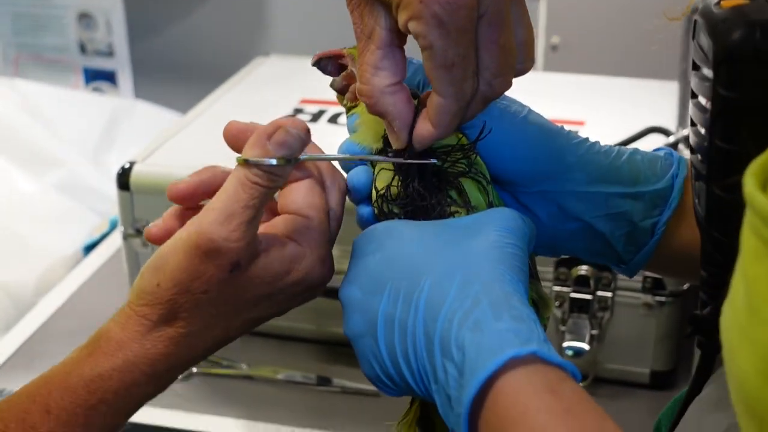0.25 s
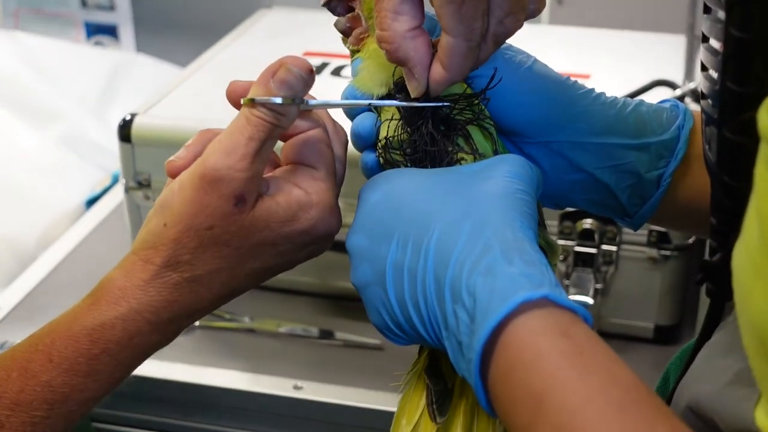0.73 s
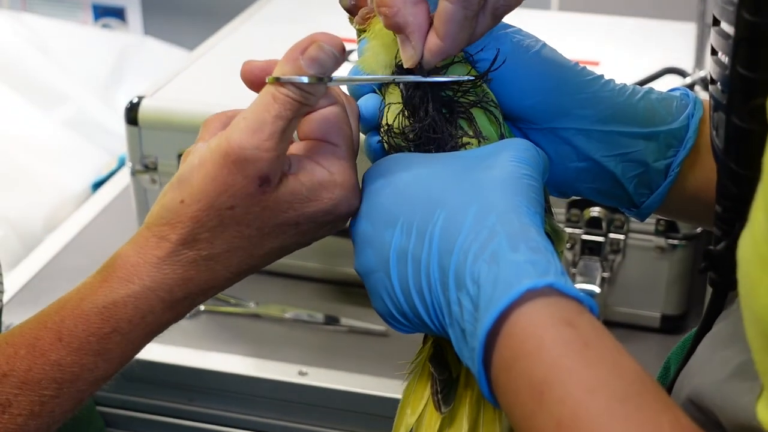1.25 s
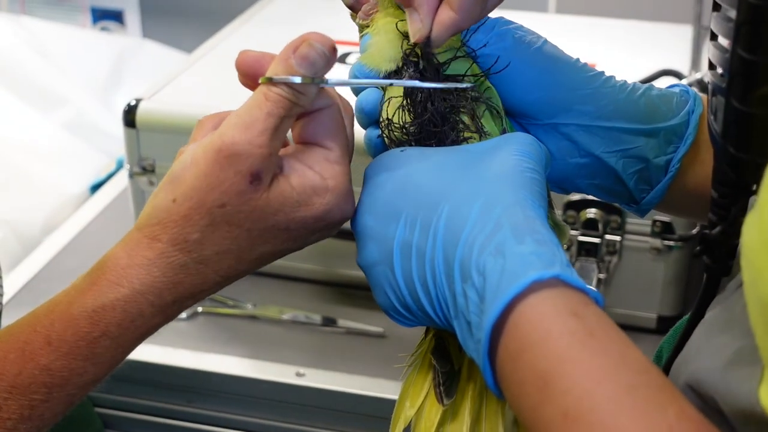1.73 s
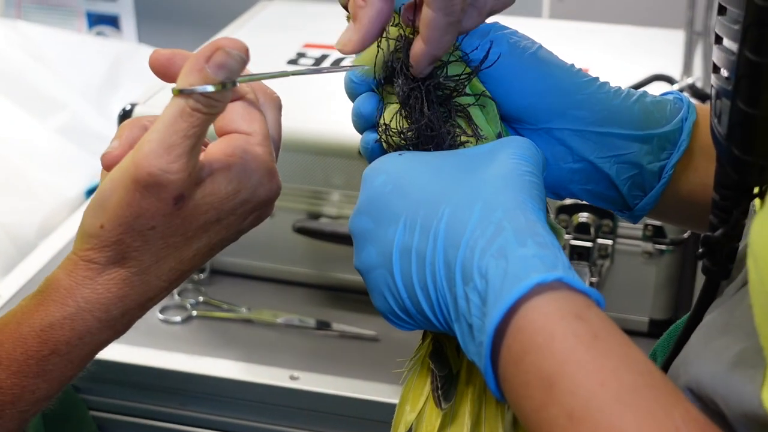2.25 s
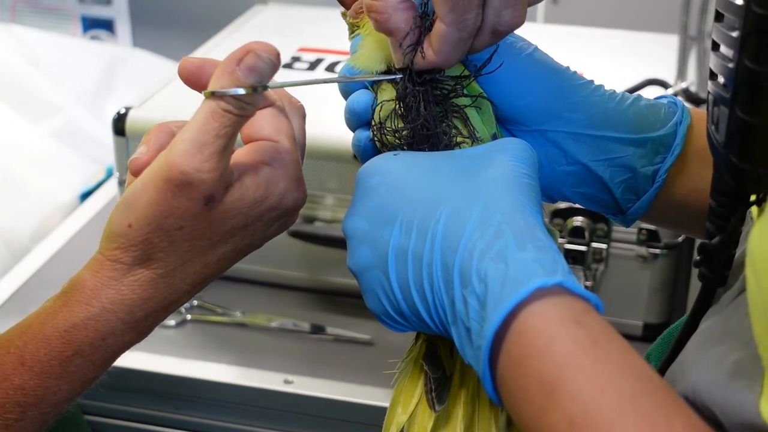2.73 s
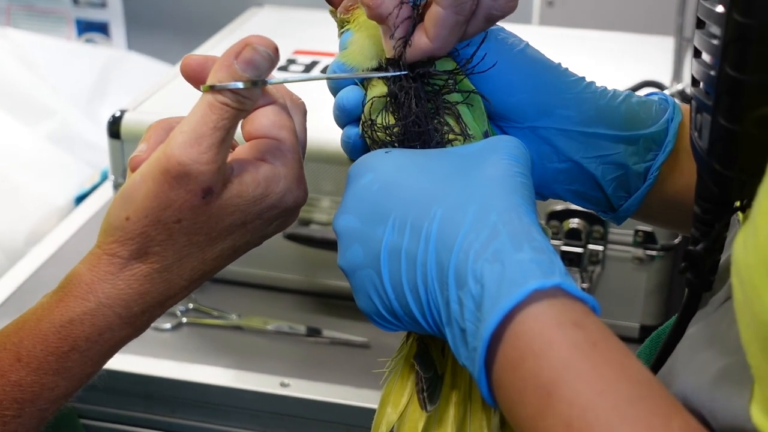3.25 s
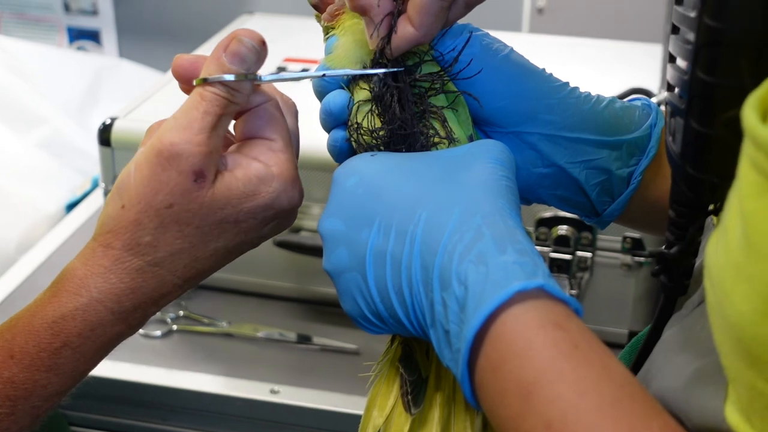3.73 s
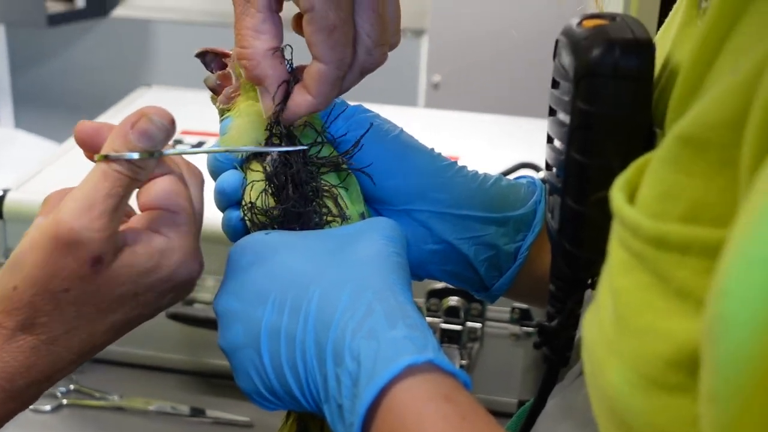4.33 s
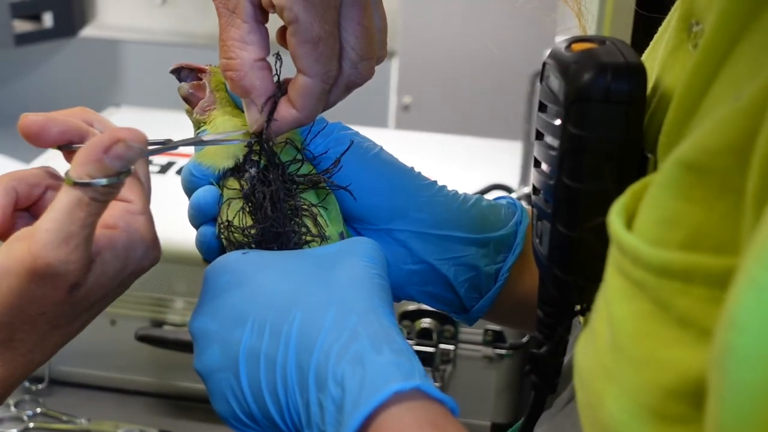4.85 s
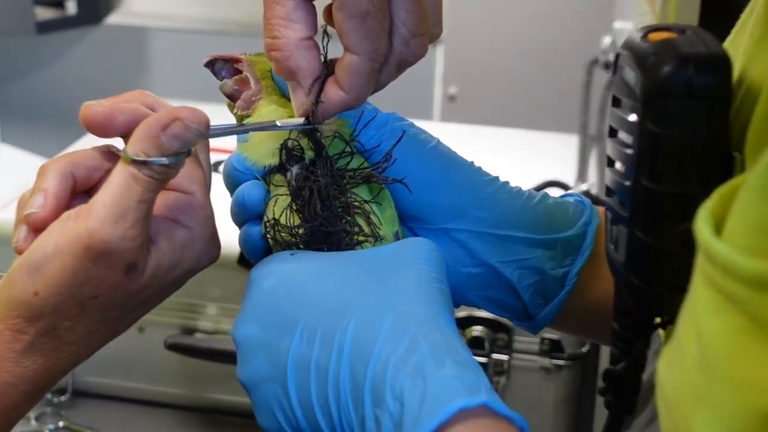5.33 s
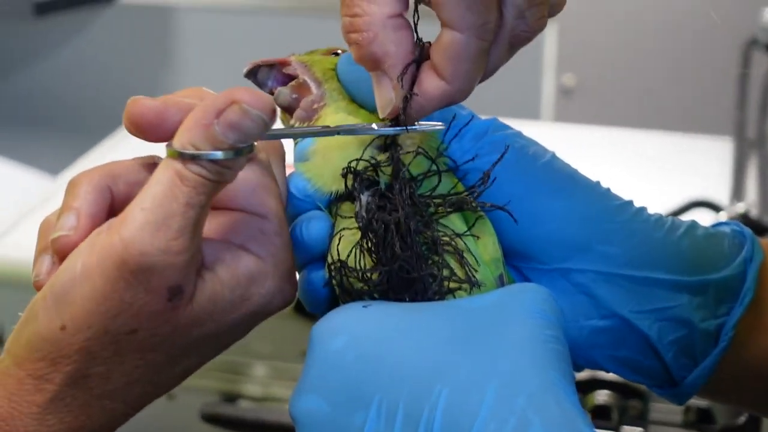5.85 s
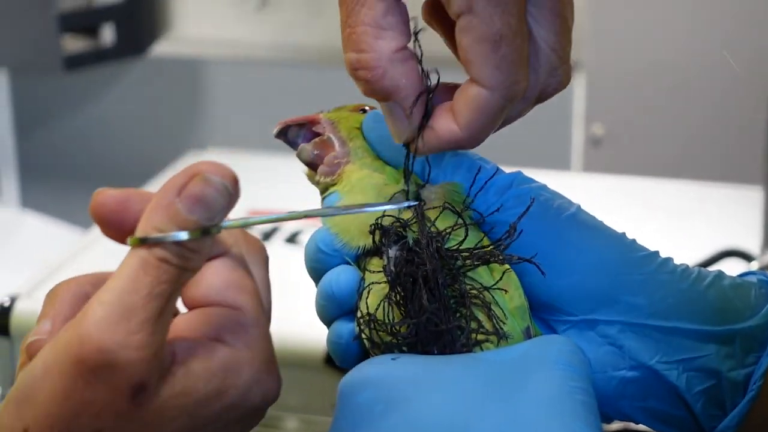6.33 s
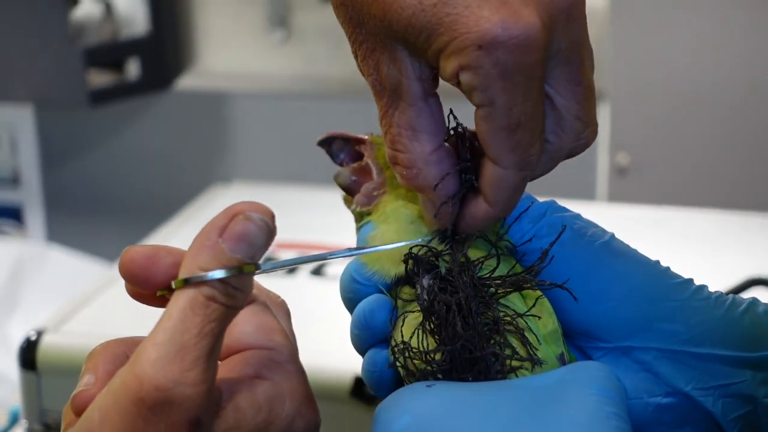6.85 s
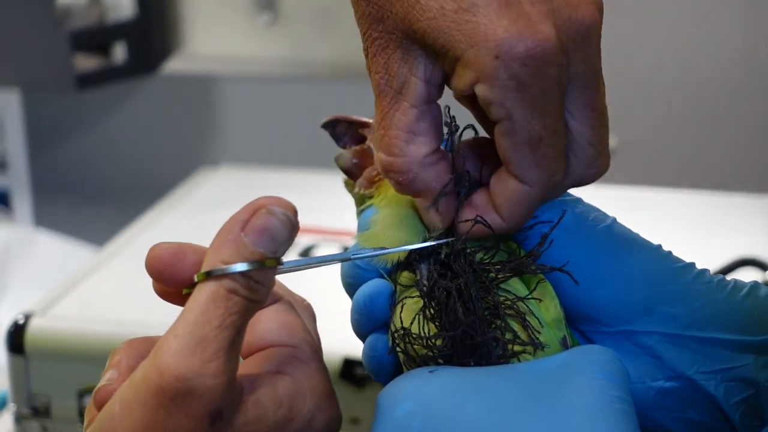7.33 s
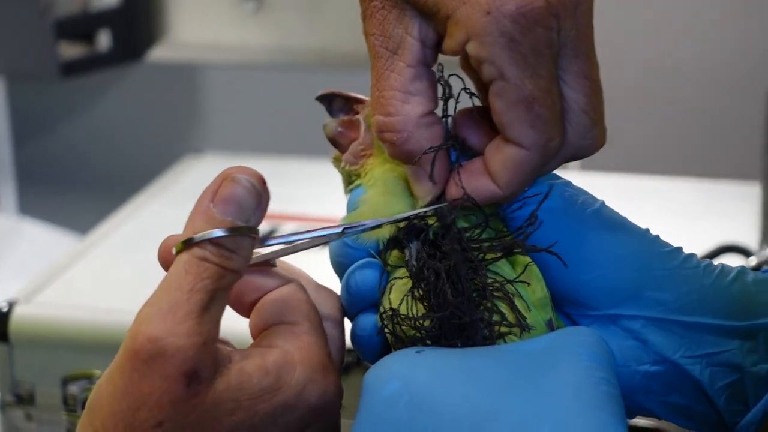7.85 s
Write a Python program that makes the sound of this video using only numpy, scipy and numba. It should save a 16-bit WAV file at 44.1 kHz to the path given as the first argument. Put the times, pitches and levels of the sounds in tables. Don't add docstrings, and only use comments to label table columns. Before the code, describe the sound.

Evenly repeated rasping, buzzing bird shrieks at close range inside a parked vehicle, over soft street hiss and a low wavering motor hum.

```python
import sys
import numpy as np
from scipy import signal
from scipy.fft import rfft, irfft
from scipy.io import wavfile
from scipy.ndimage import uniform_filter1d
from numba import njit

SR = 44100
rng = np.random.default_rng(int(sys.argv[2]) if len(sys.argv) > 2 else 0)


def persist_wave(psi):
    counts = np.round(np.clip(psi, -1, 1) * 32767).astype(np.int16)
    wavfile.write(sys.argv[1], SR, np.atleast_2d(counts).T)


def ratio_of_db(decibels):
    return 10 ** (np.asarray(decibels, float) / 20)


N = 356769
LEFT_RIGHT = np.array([[1], [-1]])


def level(x, db):
    return x * ratio_of_db(db) / np.sqrt(np.mean(x ** 2))


@njit
def svf(x, hz, width):
    y, band, low = np.empty(len(x)), 0., 0.
    for i in range(len(x)):
        g, k = np.tan(np.pi * hz[i] / SR), width / hz[i]
        v = (band + g * (x[i] - low)) / (1 + g * (g + k))
        band, low, y[i] = 2 * v - band, low + 2 * g * v, k * v
    return y


def steep(x, hz, width_hz):
    hz = hz + np.zeros(len(x))
    return svf(svf(x, hz, 1. * width_hz), hz, 1. * width_hz)


def modes(x, table, stretch=0.95):
    wall_q = 12.
    out = 0
    for k, (hz, width_hz, db) in enumerate(table):
        ring = svf(x, hz * stretch + 0. * x, max(1. * width_hz, hz / wall_q))
        out = out + (-1) ** k * ratio_of_db(db) * ring
    return out


def colour(x, table):
    hz, db = np.transpose(table)
    f = np.maximum(np.fft.rfftfreq(x.shape[-1], 1 / SR), 1)
    return irfft(rfft(x) * ratio_of_db(np.interp(np.log(f), np.log(hz), db)), x.shape[-1])


def curve(table):
    s, value = np.transpose(table)
    return np.interp(np.arange(N) / SR, s, value)


def elliptic(x, order, ripple_db, stop_db, hz, kind="low"):
    return signal.sosfilt(signal.ellip(order, ripple_db, stop_db, hz, kind, fs=SR, output="sos"), x)


def wander(count, hold_s):
    k = int(hold_s * SR)
    drift = uniform_filter1d(uniform_filter1d(rng.standard_normal((count, SR)), k), k)
    return drift * np.sqrt(1.5 * k)


def ducking():
    duck_db, recover_s = -11, .1
    t = np.arange(N) / SR
    return duck_db * sum((t > s) * np.clip((s + length - t) / recover_s + .5, 0, 1)
                         for s, length, *_ in SCREECHES)


# frequency in Hz, density in dB per Hz.
STREET_SPECTRUM = [(25, -33), (110, -19.5), (400, 0.5), (1000, -2), (1600, -6), (3000, -10.5),
                   (6300, -18.5), (16000, -33.5)]
# time in seconds, level in dB.
STREET_SWELL = [(.2, -66.5), (.95, -64), (2.55, -64), (4.1, -60), (4.95, -64.5), (5.84, -60), (6.55, -63),
                (7.35, -65.5), (8.05, -63.5)]
# time in seconds, level in dB.
MOTOR_HUM = [(0, -71.5), (2.5, -84), (3.4, -67.5), (4.1, -69), (5.05, -67.5), (5.8, -90.5), (6.6, -73),
             (7.4, -65), (8.05, -65.5)]


def background():
    mid, side = colour(rng.standard_normal((2, N)), STREET_SPECTRUM)
    hiss = level(mid + .2 * side * LEFT_RIGHT, 0) * ratio_of_db(curve(STREET_SWELL))
    mid, side = (level(steep(rng.standard_normal(N), 115, 60), -2) for _ in range(2))
    return hiss + (mid + .15 * side * LEFT_RIGHT) * ratio_of_db(curve(MOTOR_HUM) + ducking())


# time in seconds, peak in dB, ring in Hz, knock in dB, edge in dB.
TICKS = [
    (1.7565, -38, 5000, -30, -8),
    (4.118, -35, 3200, -6, -14),
    (4.131, -52, 2400, -2, -30),
    (4.153, -52, 8800, -12, -12),
    (4.218, -50, 4000, -20, -4),
    (4.2245, -27, 5500, -30, -8),
    (5.787, -41, 3000, -8, -25),
]


def clicks():
    out, t = np.zeros(N), np.arange(SR // 8) / SR
    for s, db, ring_hz, knock_db, edge_db in TICKS:
        rustle_s = .012 * ratio_of_db((db + 38) / 2)
        crack = rng.standard_normal(len(t)) * (np.exp(-t / .001) + .1 * np.exp(-t / rustle_s))
        parts = [(0, steep(crack, ring_hz, ring_hz)),
                 (knock_db, steep(crack, 470, 330)),
                 (edge_db, steep(crack, 11500, 5900))]
        i = int(s * SR)
        out[i:i + len(t)] += sum(ratio_of_db(db + part_db) * part / np.abs(part).max() for part_db, part in parts)
    return out


# time in seconds, level in dB.
SQUEAL = [
    (5.6, 4),
    (5.79, 4),
]
# frequency in Hz, level in dB.
SQUEAL_PARTIALS = [(1448, -61), (1933, -57), (2094, -69), (2417, -55), (2875, -74), (3225, -70), (3386, -64),
                   (3531, -69), (4339, -63), (4845, -74), (5329, -68), (6261, -76), (7230, -81), (9372, -82)]
# frequency in Hz, density in dB per Hz.
SQUEAL_SCRAPE = [(180, -43), (300, -13), (434, -4), (1180, -19), (1450, -7), (1650, -13), (2430, -5),
                 (14000, -35)]


def squeal():
    t = np.arange(N) / SR
    tone = sum(ratio_of_db(db) * np.sqrt(2) * np.sin(2 * np.pi * hz * t) for hz, db in SQUEAL_PARTIALS)
    scrape = level(colour(rng.standard_normal(N), SQUEAL_SCRAPE), -56)
    edge_s = 0.0036
    gate = np.clip(np.minimum(t - SQUEAL[0][0], SQUEAL[-1][0] - t) / edge_s, 0, 1)
    return gate * ratio_of_db(curve(SQUEAL)) * (tone + scrape)


@njit
def syrinx(bunch_hz, start, snap_hz, sag, bunch_stretch, stretch, size):
    snaps, phase = np.zeros(len(bunch_hz) + 1), np.empty(len(bunch_hz))
    bunch_phase, snap_phase, bunch, snap = start, 1., 0, 0
    for i in range(len(bunch_hz)):
        bunch_phase += bunch_hz[i] * bunch_stretch[bunch] / SR
        step = snap_hz[i] * (1 + sag * (.2 - bunch_phase)) * stretch[snap] / SR
        snap_phase += step
        if bunch_phase >= 1:
            bunch_phase, bunch, snap_phase = bunch_phase - 1, bunch + 1, 1.
        if snap_phase >= 1:
            snap_phase, snap = snap_phase - 1, snap + 1
            late = min(snap_phase / step, 1.)
            snaps[i] += size[snap] * late
            snaps[i + 1] += size[snap] * (1 - late)
        phase[i] = bunch_phase
    return snaps[:-1], phase


def effort(t, length):
    onset_db, swell_s, fade_db, fade_s = -8.5, 0.058, -19.5, 0.027
    ending = np.exp((t - length) / fade_s)
    return t / length, ending, onset_db * np.exp(-t / swell_s) + fade_db * ending


# time in seconds, gape 0-1, palate in dB as the head turns to the phone,
# limp in dB of every other snap.
BEAK_AND_HEAD = [(0, 0., 1.5, 1), (.55, 0.3, 3.5, 2.5), (1.3, .2, 1, 2.5), (2.1, 0.33, 3.5, 3),
                 (2.9, 0.02, 2, 2.5), (3.45, 0, 2, 5), (3.8, 0.26, 3.5, 4), (4.3, .5, 2, 7),
                 (4.7, .5, 1.5, 3.5), (5.35, 0.8, -0.5, 4.5), (6.1, 0.96, -1.5, 5.5), (6.9, .6, 1.5, 4),
                 (7.7, 0.7, 1.5, 5.5)]


def membranes(start, t, bunch_hz, fifth_hz, air):
    bunch_chance, snap_chance, size_chance = rng.standard_normal((3, 2000))
    count = np.arange(2000)
    limp_db = np.interp(start + count * 5 / fifth_hz[1], *np.transpose(BEAK_AND_HEAD)[::3])
    limp_db = limp_db + 5 * np.exp(-count / 8)
    size = ratio_of_db(.8 * size_chance + limp_db * (-1) ** count)
    lead = int(.011 * SR)
    snaps, phase = syrinx(bunch_hz, 1 - lead * bunch_hz[0] / SR, fifth_hz[0] / 5, .12,
                          1 + .012 * bunch_chance, 1 + .017 * snap_chance, size)
    flutter_db = -5 - 7.5 * np.exp(-t / 0.3)
    slap_share = 0.3
    swing = ratio_of_db(flutter_db / (1 + np.exp((slap_share - phase) / 0.02)))
    swing[:lead] = ratio_of_db(-8)
    breath = ratio_of_db(-9) * np.minimum(t / .03, 1) * air
    return swing, swing * (level(snaps - snaps.mean(), 0) + breath)


# start in seconds, length in seconds, level in dB, bunch rate in Hz,
# fifth partial of the snaps in Hz.
SCREECHES = [(-.46, .53, -17.5, 85.84, 4364), (.295, 0.49, -19, 82.26, 4280),
             (1.036, 0.53, -19.5, 80.92, 4236), (1.84, 0.53, -19.5, 84.68, 4152),
             (2.652, 0.5, -19.5, 82.63, 4173), (3.44, 0.51, -19.5, 82.58, 4197),
             (4.271, 0.49, -19.5, 84, 4200), (5.082, 0.56, -20.5, 82.4, 4293),
             (5.886, 0.51, -19, 82.7, 4334), (6.675, 0.53, -19, 86.38, 4236),
             (7.449, 0.51, -19, 82.94, 4150)]
# frequency in Hz, width in Hz, level in dB.
CHEST_MODES = [(810, 330, 0), (1340, 350, -6)]
THROAT_MODES = [(2594, 228, -4.5), (1972, 1500, -3.5), (3010, 1200, -6.5)]
PALATE_MODES = [(5394, 450, -2.5), (5940, 730, -6)]
RASP_MODES = [(7790, 600, 3), (9780, 1100, -0.5), (11900, 2400, -11.5), (15200, 2900, -8.5)]
BODY_MODES = [(520, 110, -22.5)]


def parakeet():
    out = np.zeros(N + SR)
    head_s, gapes, palates_db, _ = np.transpose(BEAK_AND_HEAD)
    for start, length, top_db, rate_hz, pitch_hz in SCREECHES:
        t = np.arange(int(length * SR)) / SR
        air = rng.standard_normal(SR)
        breath_air, tract_air = air[:len(t)], air[-len(t):]
        drifts = wander(count=6, hold_s=.06)[:, :len(t)]
        pitch_drift, chest_drift, throat_drift, rasp_drift, palate_drift, shift_drift = drifts
        gone, ending, lost_db = effort(t, length)
        gape = np.clip(np.interp(start + t, head_s, gapes), 0, 1)
        palate_db = np.interp(start + t, head_s, palates_db) + 1.5 * palate_drift

        bunch_hz = rate_hz + 2.5 * (.5 - gone) - 3.5 * ending
        fifth_hz = pitch_hz + 170.4 * (np.exp(-t / .1) - .2) + 43 * pitch_drift
        chest_db = -15 - 0.5 * lost_db + 1.5 * chest_drift
        throat_db = -9 - 0.43 * lost_db + 2.5 * gone - 2.5 * gape + 1.5 * throat_drift
        rasp_db = -10 - 0.14 * lost_db + 1.5 * rasp_drift

        swing, source = membranes(start, t, bunch_hz, (fifth_hz, pitch_hz), breath_air)
        source = source - .97 * (1 - gape) * svf(source, fifth_hz * 2 / 5, 180.)
        neck = fifth_hz / 4270
        beak = svf(source, fifth_hz, 680.) - ratio_of_db(palate_db) * modes(source, PALATE_MODES, neck)
        throat = modes(source, THROAT_MODES, 1 + .025 * shift_drift)
        rasp = steep(modes(source + ratio_of_db(-8) * tract_air, RASP_MODES), 10000, 12000)
        chest_neck = neck * (1 + .1 * (.5 - gone))
        chest = steep(modes(source + ratio_of_db(1) * swing * tract_air, CHEST_MODES, chest_neck), 1050, 1100)

        voice = level(beak, 0) + ratio_of_db(throat_db) * level(throat, 0)
        tract_top_hz = 6900
        voice = signal.sosfilt(signal.butter(4, tract_top_hz, fs=SR, output="sos"), voice)
        voice = voice + ratio_of_db(rasp_db) * level(rasp, 0) + ratio_of_db(chest_db) * level(chest, 0)
        voice = elliptic(voice, 4, 1, 40, 730, "high")
        voice += ratio_of_db(chest_db) * modes(level(modes(swing * breath_air, BODY_MODES), 0), BODY_MODES)
        fade = np.minimum(np.arange(len(t))[::-1] / (0.00091 * SR), 1)
        i = int(start * SR) + SR
        out[i:i + len(t)] += ratio_of_db(top_db + lost_db) * fade * voice
    return out[SR:]


def cabin(x):
    bass_t60_s, treble_t60_s, mid_db, side_db = 0.13, 0.1, -4.5, -12.5
    t = np.arange(SR // 2) / SR
    echoes = rng.standard_normal((4, len(t))) * np.clip((t - .0012) / 0.0044, 0, 1)
    bass = uniform_filter1d(echoes, size=7)
    tail = bass * ratio_of_db(-60 * t / bass_t60_s) + (echoes - bass) * ratio_of_db(-60 * t / treble_t60_s)
    turns_per_s = .15
    angle = 2 * np.pi * turns_per_s * np.arange(N) / SR
    here, there = x * np.cos(angle), x * np.sin(angle)
    ring = [signal.fftconvolve(v, h / np.linalg.norm(h))[:N]
            for v, h in zip((here, there, here, there), tail)]
    mid, side = ring[0] + ring[1], ring[2] + ring[3]
    side = .5 * side + signal.lfilter(*signal.butter(1, 2600, "high", fs=SR), side)
    return x + ratio_of_db(mid_db) * mid + ratio_of_db(side_db) * side * LEFT_RIGHT


def scene():
    ticks, whine = clicks(), squeal()
    inside = ratio_of_db(-1.5) * cabin(parakeet() + .3 * ticks + .4 * whine)
    return inside + .7 * ticks + .65 * whine + background()


def roll_off(x):
    return signal.sosfilt(signal.butter(12, 15990, fs=SR, output="sos"), x)


def record(dry):
    rounding, top_hz = 0.66, 15900
    mix = elliptic(np.tanh(rounding * dry) / rounding, 8, .2, 60, top_hz)
    return roll_off(mix)


dry = scene()
out = record(dry)
persist_wave(out)
```